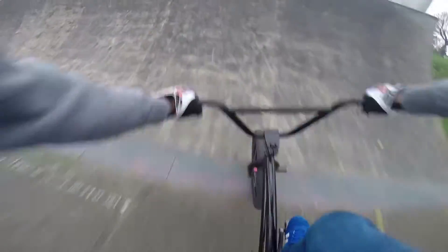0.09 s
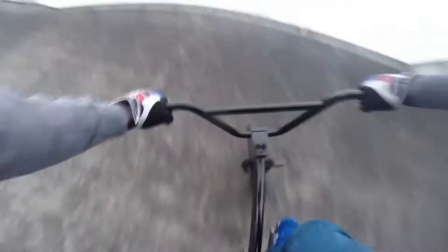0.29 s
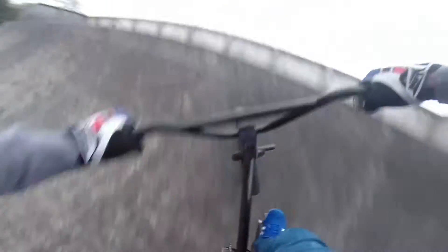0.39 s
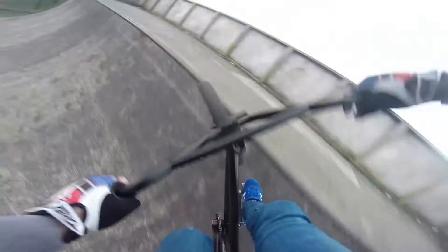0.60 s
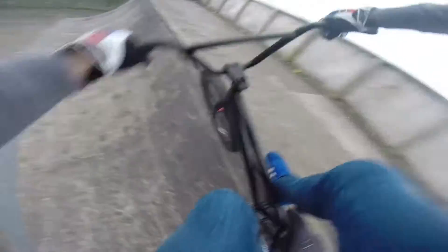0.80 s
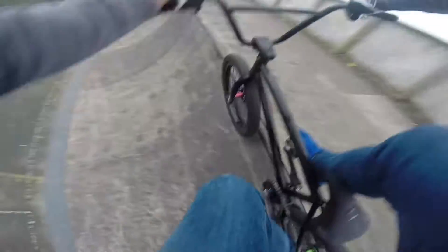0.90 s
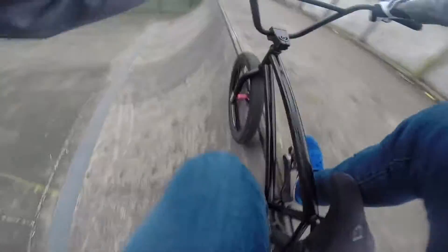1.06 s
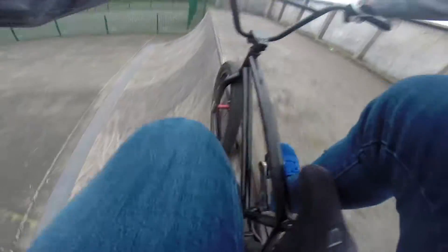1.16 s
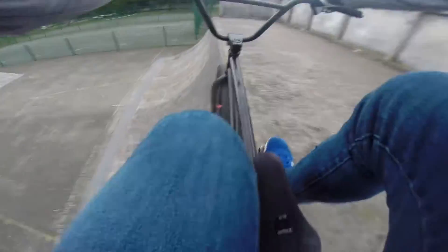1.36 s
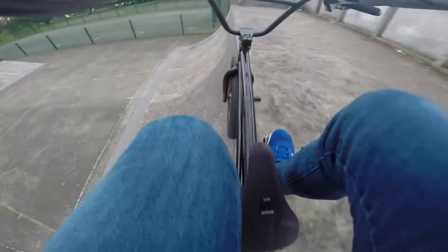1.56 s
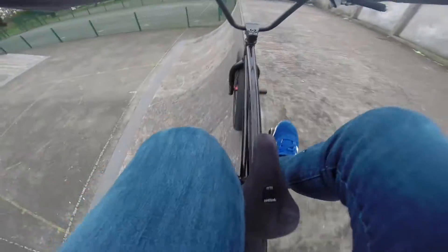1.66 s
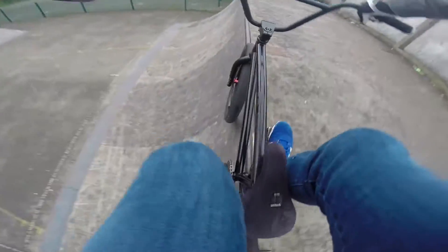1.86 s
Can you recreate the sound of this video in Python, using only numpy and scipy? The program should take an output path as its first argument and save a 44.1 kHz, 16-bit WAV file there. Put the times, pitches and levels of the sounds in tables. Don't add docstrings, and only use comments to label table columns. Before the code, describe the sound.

Bike landing: hard plastic knocks, buzzing chain, a double metallic frame clank, then gritty tyre hiss

```python
import sys
import numpy as np
from scipy import signal
from scipy.io import wavfile
from scipy.ndimage import uniform_filter1d

SR = 44100
rng = np.random.default_rng(int(sys.argv[2]) if len(sys.argv) > 2 else 0)


def put_to_file(sound):
    columns = np.atleast_2d(sound).T
    safe = np.clip(columns, -1, 1)
    whole_steps = np.round(safe * 32767)
    wavfile.write(sys.argv[1], SR, whole_steps.astype(np.int16))


def convert_level_to_amplitude(level_db):
    exponent = np.asarray(level_db, float) / 20
    return 10 ** exponent


N = 83790
LANDED_S = 1.12


def rms_one(x):
    return x / np.sqrt(np.mean(x ** 2) + 1e-20)


def in_time(rows):
    s, *columns = np.transpose(rows)
    return [np.interp(np.arange(N) / SR, s, column) for column in columns]


def drift(rate_hz):
    r = np.exp(-2 * np.pi * rate_hz / SR)
    wander = signal.lfilter([1], [1, -2 * r, r * r], rng.standard_normal(N + SR))
    return rms_one(wander[SR:])


def ring(clicks, hz, t60):
    r = convert_level_to_amplitude(-60 / (t60 * SR))
    w = 2 * np.pi * hz / SR
    return signal.lfilter([0, np.sin(w)], [1, -2 * r * np.cos(w), r * r], clicks + 1e-18)


def struck(clicks, modes):
    return sum(convert_level_to_amplitude(db) * ring(clicks, hz, t60) * (-1) ** k for k, (hz, db, t60) in enumerate(modes))


def at(times, gains):
    out = np.zeros(N)
    samples = (np.asarray(times) * SR).astype(int)
    np.add.at(out, np.clip(samples, 0, N - 1), gains)
    return out


def grit(rate, spread_db):
    happens = rng.random(N) < rate / SR
    size = convert_level_to_amplitude(spread_db * np.minimum(rng.exponential(1, N), 4))
    return happens * size * rng.choice([-1, 1], N)


def cavity(x):
    # (frequency [Hz], width [Hz], level [dB])
    resonances = [(2260, 250, 7), (3240, 1080, 5), (3937, 800, -9.5), (5020, 1460, 3.5), (6130, 100, -2.5),
                  (8600, 180, -44)]
    for hz, width_hz, db in resonances:
        x = x + (convert_level_to_amplitude(db) - 1) * signal.lfilter(*signal.iirpeak(hz, hz / width_hz, SR), x)
    return x


def sealed(x):
    return signal.sosfilt(signal.butter(3, 6180, fs=SR, output="sos"), x)


def coloured(source, spectrum, patchy_db):
    hz, db = np.transpose(spectrum)
    count = int(3 * np.log2(hz[-1] / hz[0])) + 2
    edges = np.geomspace(hz[0], min(hz[-1], 20000), count)
    together = drift(47)
    sources = source, np.roll(source, N // 3)
    out = 0
    for k, (low, high) in enumerate(zip(edges, edges[1:])):
        bandpass = signal.butter(2, [low, high], "band", fs=SR, output="sos")
        band = signal.sosfilt(bandpass, sources[k % 2])
        level_db = np.interp(np.log(low * high) / 2, np.log(hz), db)
        flicker_db = patchy_db * (0.93 * together + drift(30.0))
        out = out + band * convert_level_to_amplitude(level_db + flicker_db)
    return rms_one(out)


def electronics():
    # (frequency [Hz], density [dB per Hz])
    floor_colour = [(300, -22), (476, -13), (900, -8.5), (5040, -12.5), (8000, -28), (15500, -30)]
    # (frequency [Hz], level [dB])
    whines = [(8781, -69), (14690, -73)]
    t = np.arange(N) / SR
    tones = sum(convert_level_to_amplitude(db + 2 * drift(30)) * np.sin(2 * np.pi * hz * t) for hz, db in whines)
    noise = rms_one(cavity(coloured(rng.standard_normal(N), floor_colour, patchy_db=2.5)))
    return convert_level_to_amplitude(-59.5 + 5) * noise + tones


def rolling():
    # (time [s], hiss level [dB], rumble level [dB])
    roll = [(0, -55, -55), (.19, -45, -56), (.24, -43, -44.5), (.36, -47, -42), (.45, -54.5, -45.5),
            (.6, -52.5, -51), (.72, -57.5, -60), (.9, -44, -59), (1.05, -43, -46.5), (1.17, -39.5, -42),
            (1.28, -37.5, -43.5), (1.45, -42.5, -42.5), (1.57, -42, -48), (1.69, -47, -48.5),
            (1.76, -48, -46), (1.9, -67, -61.5)]
    # (frequency [Hz], density [dB per Hz])
    hiss_colour = [(500, 0.5), (1500, 1), (2700, -4), (3900, -7.5), (9000, -17.5), (14000, -66)]
    # (frequency [Hz], density [dB per Hz])
    rumble_colour = [(60, -9), (102, -2.5), (145, -8), (314, -9.5), (505, -20), (1000, -29)]
    # (frequency [Hz], density [dB per Hz])
    air_colour = [(500, -13), (1500, -7.5), (2300, -12), (5000, -10.5), (9000, -25.5), (14000, -24)]
    # (frequency [Hz], level [dB])
    singing = [(1450, -5.5), (2150, -9.5), (2650, 0), (2850, -2.5), (3450, -2.5), (4330, -8), (7400, -16)]
    # (frequency [Hz], level [dB], t60 [s])
    humming = [(3460, -11, .1), (5050, -12.5, 0.062), (2220, -12.5, 0.074)]

    hiss_db, rumble_db = in_time(roll)
    landed = np.clip((np.arange(N) / SR - LANDED_S) / 0.027, 0, 1)

    stones = rms_one(grit(900, spread_db=1.5))
    tyre_source = rng.standard_normal(N) + 0.92 * stones
    tyre = rms_one(cavity(coloured(tyre_source, hiss_colour, patchy_db=-0.5)))
    sing = sum(convert_level_to_amplitude(db + 4.6 * drift(9.6)) * rms_one(ring(stones, hz, 0.037)) for hz, db in singing)

    air = rms_one(cavity(coloured(rng.standard_normal(N), air_colour, patchy_db=1.5)))
    for hz, db, t60 in humming:
        air = air + convert_level_to_amplitude(db + 3.3 * drift(8)) * rms_one(ring(rng.standard_normal(N), hz, t60))

    hiss = landed * (tyre + convert_level_to_amplitude(-6) * sing) + (1 - landed) * convert_level_to_amplitude(0.5) * air
    rumble = coloured(rng.standard_normal(N), rumble_colour, patchy_db=1.0)
    return convert_level_to_amplitude(hiss_db - 5.0) * hiss + convert_level_to_amplitude(rumble_db + 3.5) * rumble


def shaking():
    # (time [s], level [dB])
    shake = [(0, -35), (.15, -33), (.25, -41), (.35, -33), (.45, -40), (.7, -43), (.9, -40), (1.05, -40),
             (1.17, -36), (1.24, -44), (1.32, -52), (1.42, -42), (1.62, -52), (1.72, -41), (1.9, -35)]
    # (time [s], level [dB], pitch [Hz], t60 [s])
    lurches = [(.567, -7.5, 35, .11), (.627, -17, 34, .1), (.941, -20, 31, .28), (1.047, -19, 22, .18),
               (.2, -21, 38, .1), (1.119, -23, 190, .07), (.296, -22, 140, .07), (1.285, -32, 100, .2),
               (1.697, -30, 70, .08), (.577, -27, 105, .04), (.565, -23, 155, .05), (.988, -27, 90, .06),
               (1.092, -19, 90, .06), (1.101, -17, 48, .16), (.75, -40, 143, .07), (1.69, -34, 130, .07),
               (1.19, -30, 65, .05), (1.4, -34, 125, .2), (.215, -30, 113, .05), (.43, -32, 130, .1)]
    lurch_signs = [1, 1, -1, -1, -1, -1, 1, 1, -1, 1, 1, -1, -1, -1, 1, 1, -1, 1, 1, 1]
    t = np.arange(N) / SR
    bass = signal.butter(2, [22, 52], "band", fs=SR, output="sos")
    sway = signal.sosfilt(bass, rng.standard_normal(N + SR))[SR:]
    out = convert_level_to_amplitude(in_time(shake)[0]) * sway / np.sqrt(uniform_filter1d(sway ** 2, size=5000))
    for (s, db, hz, t60), sign in zip(lurches, lurch_signs):
        age = np.maximum(t - s, 0) * np.log(1000) / t60
        out += sign * convert_level_to_amplitude(db) * age * np.exp(1 - age) * np.sin(2 * np.pi * hz * (t - s))
    return out


def scuffs():
    # (time [s], length [s], level [dB], brightness [Hz])
    drags = [(0, 0.0024, -64, 920), (0.222, 0.028, -35.5, 1480), (0.292, 0.022, -37, 330),
             (0.349, 0.015, -42.5, 1150), (0.566, 0.021, -41, 1270), (0.627, 0.042, -48, 2500),
             (1.78, 0.0022, -29.5, 1750), (.93, 0.028, -42.5, 3260), (0.99, 0.0057, -36, 2500),
             (1.02, 0.0072, -38.5, 3930), (1.051, 0.018, -34.5, 4200), (1.066, 0.018, -38.5, 2500),
             (1.203, 0.038, -36, 2020), (1.24, 0.029, -44, 3160), (1.257, 0.0059, -34.5, 1710),
             (1.093, 0.015, -27.5, 490), (1.119, 0.023, -28, 370), (1.438, 0.0096, -39, 446),
             (0.228, 0.0081, -38, 404), (0.359, 0.015, -39.5, 345), (1.656, 0.059, -46.5, 1610)]
    t = np.arange(N) / SR
    fibres = rms_one(grit(2500, spread_db=3.0))
    source = sealed(cavity(rng.standard_normal(N) + 0.5 * fibres))
    out = 0
    for s, length, db, hz in drags:
        shape = np.clip((t - s) / 0.005, 0, 1) * np.exp(-np.maximum(t - s - length, 0) / 0.004)
        bandpass = signal.butter(1, [hz / 1.58, hz], "band", fs=SR, output="sos")
        out = out + convert_level_to_amplitude(db) * shape * rms_one(signal.sosfilt(bandpass, source))
    return out


def ping():
    return ring(at([0], convert_level_to_amplitude(-43)), 5010, 0.07)


def knocks():
    # (time [s], peak level [dB], thump level [dB])
    blows = [
        (0.2545, -10, -7.5),
        (0.39, 1.5, -9),
        (0.492, -4, -9.5),
        (.816, -35, -24),
        (0.895, -31, -24),
    ]
    # (frequency [Hz], level [dB], t60 [s])
    housing = [(656, -6, 0.012), (344, -9, 0.018), (1150, -10.5, 0.023), (1358, -6.5, 0.024),
               (2149, 1, 0.017), (2383, -4, 0.0078), (2266, -32.5, 0.094), (2930, -4.5, 0.011),
               (3240, -11.5, 0.018), (3690, -6.5, 0.014), (4680, -12.5, 0.0061), (4990, -8, 0.0099),
               (6140, -12, 0.0076), (7300, -29, 0.0088)]
    # (frequency [Hz], level [dB], t60 [s])
    mount = [(138, -2, 0.078), (312, -8, 0.046), (112, -16.5, 0.25)]
    crack_db, crack_t60_s = -5, 0.015
    thump_lag_s, thump_soft_hz = 0.00442, 474
    s, db, thump_db = np.transpose(blows)

    crack_fall = convert_level_to_amplitude(-60 / (crack_t60_s * SR))
    dying = signal.lfilter([1], [1, -crack_fall], at(s, convert_level_to_amplitude(db + crack_db)))
    crack_band = signal.butter(1, [400, 2500], "band", fs=SR)
    crack = cavity(signal.lfilter(*crack_band, dying * rng.standard_normal(N)))

    hard = at(s, convert_level_to_amplitude(db - 7.0)) + at(s + 0.00044, convert_level_to_amplitude(db - 20.0))
    shell = sealed(sealed(struck(hard, housing) + crack))
    push = at(s + thump_lag_s, -convert_level_to_amplitude(db + thump_db))
    soft = signal.lfilter(*signal.butter(2, thump_soft_hz, fs=SR), push)
    snap = ring(at(s + 0.0001, convert_level_to_amplitude(2 * db - 41)), 17000, 0.00074)
    return shell + struck(soft, mount) + snap


def freewheel():
    # (time [s], peak level [dB])
    pawl_ticks = [(1.246, -52), (1.262, -52.5), (1.2826, -56), (1.2986, -54), (1.3166, -54), (1.337, -56),
                  (1.356, -54), (1.378, -53), (1.3969, -56), (1.4153, -60), (1.4348, -57), (1.4524, -57),
                  (1.546, -56), (1.5635, -62), (1.581, -56.5), (1.6009, -61), (1.6209, -62), (1.6403, -63),
                  (1.6598, -60), (1.6792, -63), (1.6976, -61), (1.7346, -61), (1.78, -62), (1.8145, -61),
                  (1.8558, -62)]
    # (frequency [Hz], level [dB], t60 [s])
    pawl_modes = [(5300, -6, .008), (10400, -4, .008), (11400, -2, .01), (12300, 0, .008),
                  (13200, -3, .008)]
    # (time [s], rate [links per s], level [dB])
    chain = [
        (.62, 90, -52),
        (.7, 92, -42),
        (.82, 95, -38),
        (.9, 100, -43),
        (.96, 100, -52),
    ]
    chain_hz, chain_t60_s = 3370, 0.0083
    s, db = np.transpose(pawl_ticks)
    pawl = at(s, convert_level_to_amplitude(db - 14))
    ticks = 0
    for hz, level, t60 in pawl_modes:
        uneven = pawl * convert_level_to_amplitude(level + rng.normal(0, 4, N))
        ticks = ticks + ring(ring(uneven, hz, t60), hz, 0.002)

    rate, chain_db = in_time(chain)
    links_passed = np.cumsum(rate * (1 + 0.04 * drift(30))) / SR
    in_flight = np.arange(N) <= LANDED_S * SR
    links = in_flight * (np.diff(np.floor(links_passed), prepend=0) > 0)
    link_clicks = links * convert_level_to_amplitude(chain_db - 20.0 + rng.normal(0, 4.5, N))
    return ticks + ring(ring(link_clicks, chain_hz, chain_t60_s), chain_hz, 0.0026)


def clanks():
    # (time [s], peak level [dB], damped after [s])
    touches = [
        (1.0875, -13, .023),
        (1.12, -9.5, .088),
    ]
    # (frequency [Hz], level [dB], t60 [s])
    loaded = [(1675, -2, 0.4), (1490, -4, .04), (3186, -3, 0.025), (3467, -12, 0.06), (4649, -1, 0.35),
              (4520, -4, 0.25), (4880, -5, .025), (6270, -17, .1), (8463, -12, 0.05), (9900, -13, .015),
              (11740, -21, 0.08), (12100, -18, .02)]
    # (frequency [Hz], level [dB], t60 [s])
    free = [(1642, 1, 0.1), (1750, 6, 0.063), (2240, 8.5, 0.024), (2557, -9.5, 0.096), (2810, 0, 0.029),
            (3440, -9.5, 0.06), (4355, -1, 0.15), (4425, -12, 0.48), (5070, 0, 0.02), (6240, -19, 0.077),
            (7520, -20, 0.18), (8150, -3, 0.017), (9770, -14, 0.068), (11530, -26, 0.28)]
    # (time [s], level [dB])
    retouches = [
        [(1.097, -1.5), (1.103, -4.5), (1.107, -12)],
        [(1.134, -7.5), (1.141, -9), (1.156, -21), (1.167, -28)],
    ]
    # (frequency [Hz], density [dB per Hz])
    crash_colour = [(100, -8), (250, -12.5), (900, -30), (1700, -15.5), (4000, -30), (5300, -27.5),
                    (8000, -35), (15500, -46)]
    contact_s, wobble_db, shimmer_hz, soft_t60_s = 0.0025, 3, 8000, 0.15
    rattle_per_s, rattle_db, rattle_t60_s = 500, -32, 0.1
    crash_db, crash_t60_s = -3.5, 0.037

    t, out = np.arange(N) / SR, 0
    crash = coloured(rng.standard_normal(N), crash_colour, patchy_db=1.0)
    for (s, db, damped_s), modes, again in zip(touches, (loaded, free), retouches):
        after = np.maximum(t - s, 0)
        contact = after / contact_s * np.exp(1 - after / contact_s * 2)
        grinding = convert_level_to_amplitude(-34) * contact * rng.standard_normal(N)
        rattle_level = (t > s) * convert_level_to_amplitude(rattle_db - 60 * after / rattle_t60_s)
        rattle = rattle_level * grit(rattle_per_s, spread_db=3)
        hits = at([s + contact_s / 2], 0.85) + grinding + rattle
        again_s, again_db = np.transpose(again)

        body = 0
        for hz, level, t60 in modes:
            wobble = wobble_db * max(1, hz / shimmer_hz) * drift(68)
            again_gain = convert_level_to_amplitude(again_db + rng.normal(0, 4, len(again))) * rng.choice([-1, 1], len(again))
            all_hits = hits + min(1, t60 / soft_t60_s) * at(again_s, again_gain)
            twin_hz = hz * (1 + rng.choice([-1, 1]) * 0.02)
            pair = ring(all_hits, hz, t60) + 0.15 * ring(hits, twin_hz, t60 / 2)
            body = body + convert_level_to_amplitude(level - 8.5 + wobble) * pair
        body = signal.lfilter(*signal.butter(2, 1300, "high", fs=SR), body)

        crash_fall = convert_level_to_amplitude(crash_db - 60 * after / crash_t60_s) + convert_level_to_amplitude(-19 - 60 * after / 0.37)
        body = body + np.clip(after / contact_s, 0, 1) * crash * crash_fall
        damping = 0.15 + 0.85 * np.exp(-np.maximum(after - damped_s, 0) / 0.002)
        out = out + convert_level_to_amplitude(db) * body * damping
    return out


def scene():
    body_and_air = electronics() + rolling() + shaking() + scuffs()
    bike = ping() + knocks() + freewheel() + clanks()
    return (body_and_air + bike)[None]


def roll_off(x):
    return signal.sosfilt(signal.butter(12, 15630, fs=SR, output="sos"), x)


def record(dry):
    top_cut = signal.cheby2(6, 35, 16000, fs=SR, output="sos")
    mix = signal.sosfilt(top_cut, np.clip(dry, -1, 1))
    return roll_off(mix)


dry = scene()
out = record(dry)
put_to_file(out)
```